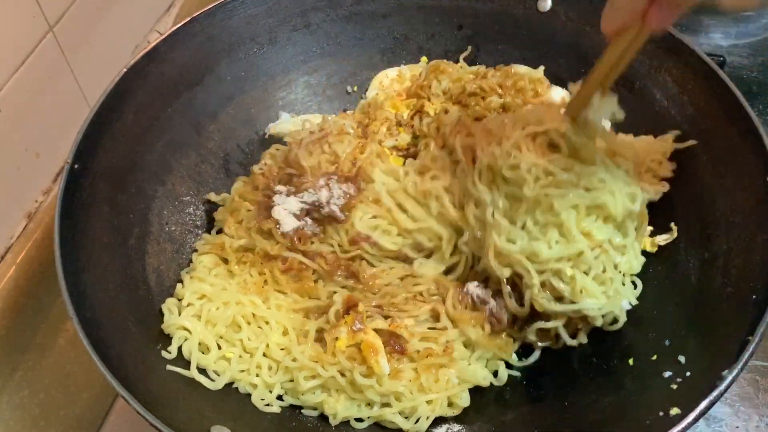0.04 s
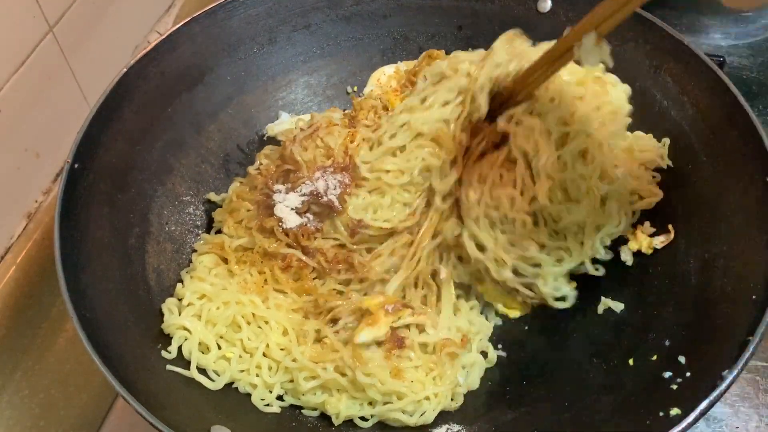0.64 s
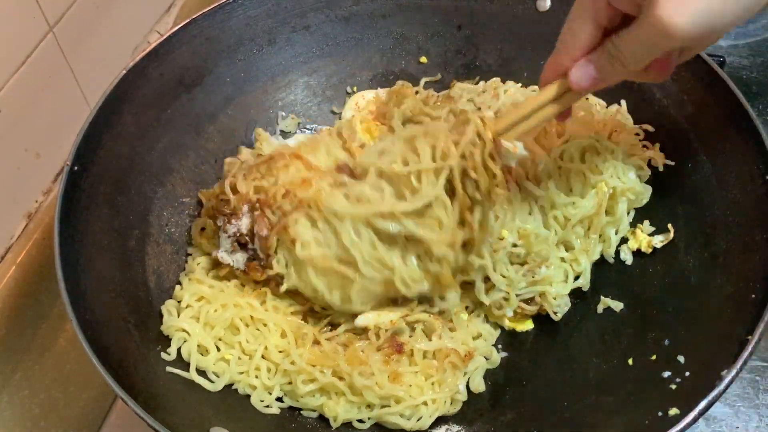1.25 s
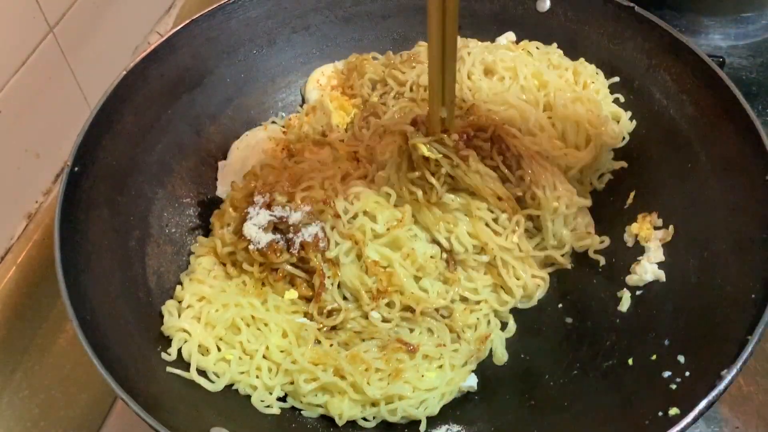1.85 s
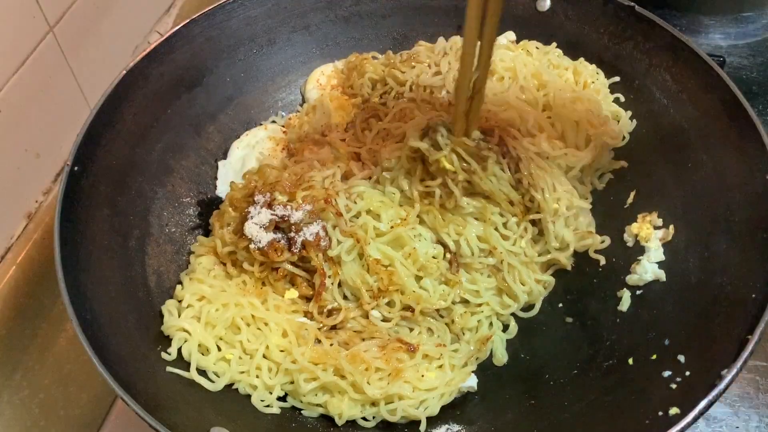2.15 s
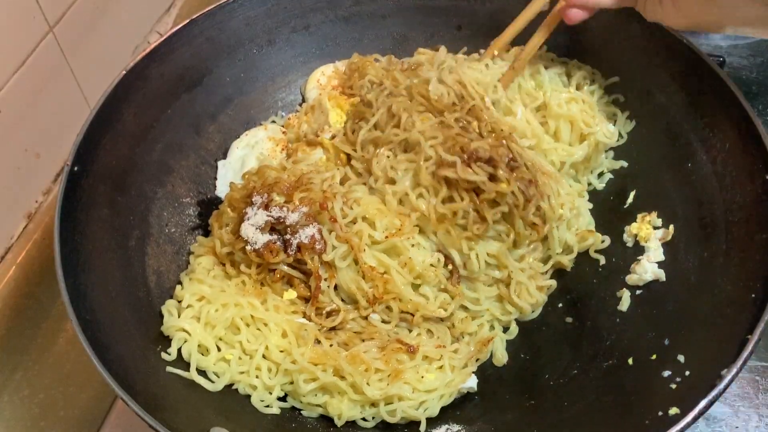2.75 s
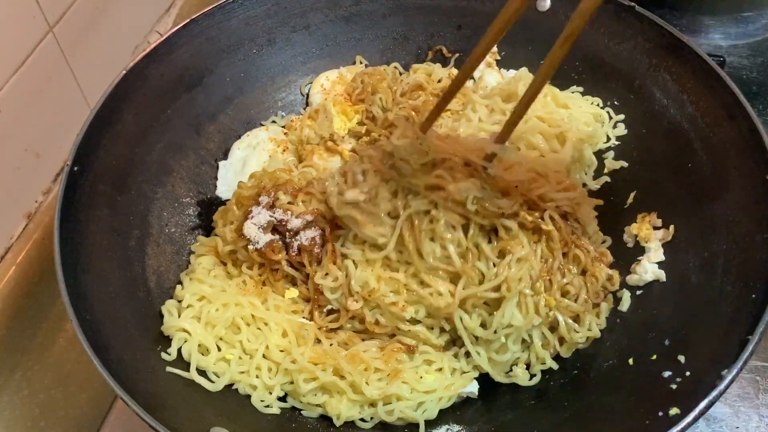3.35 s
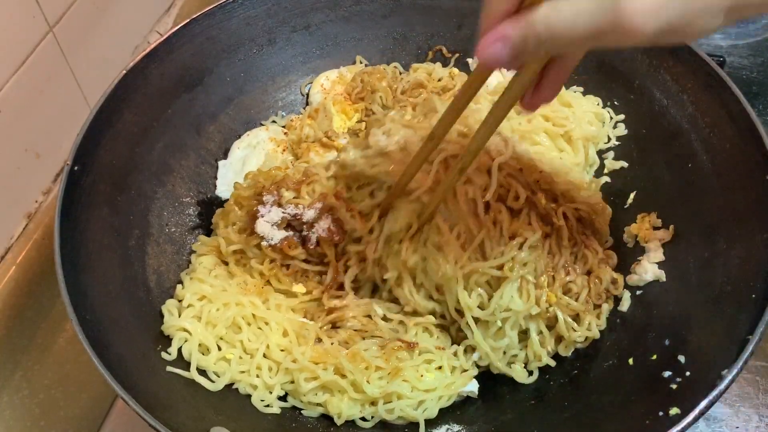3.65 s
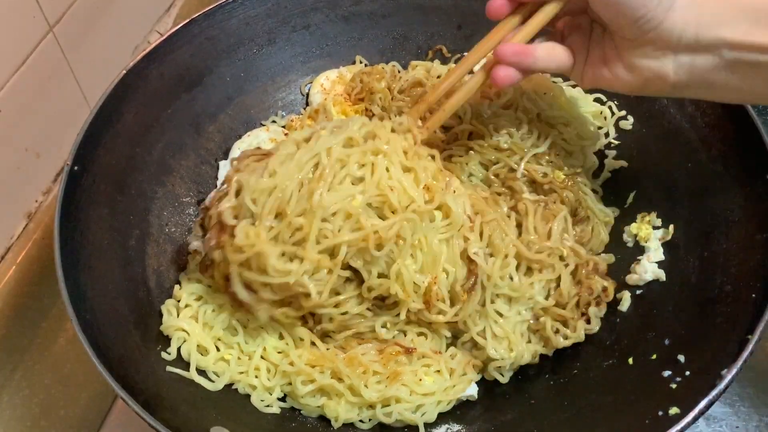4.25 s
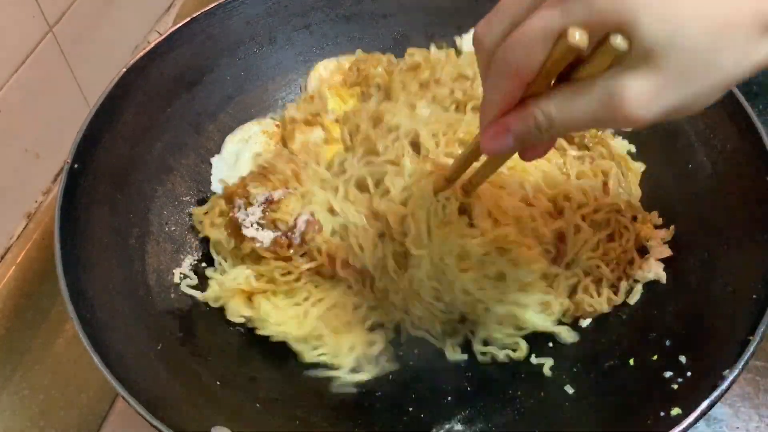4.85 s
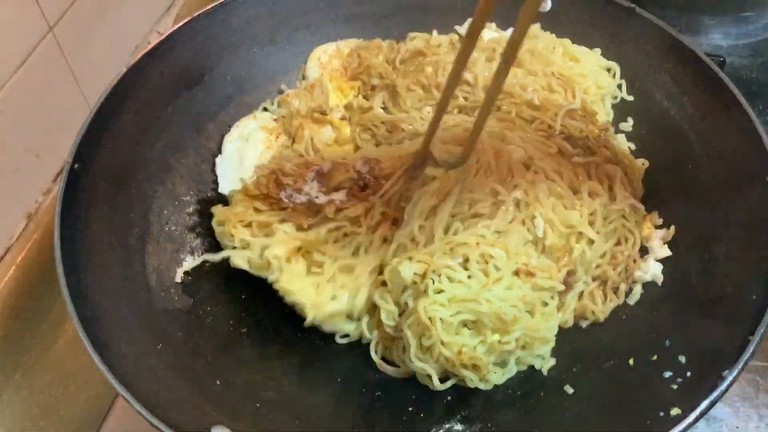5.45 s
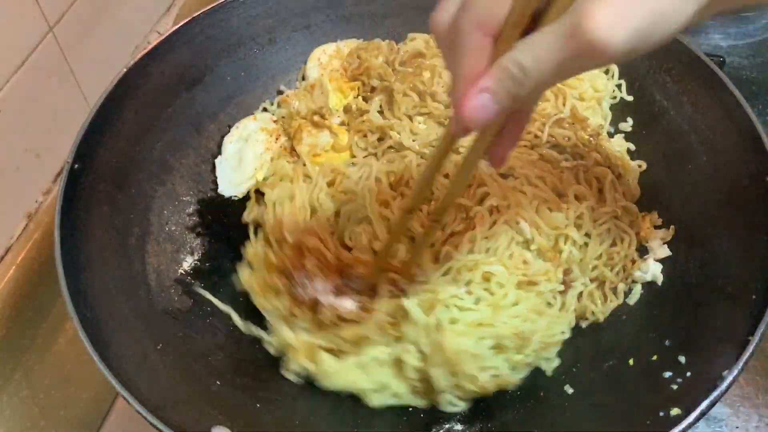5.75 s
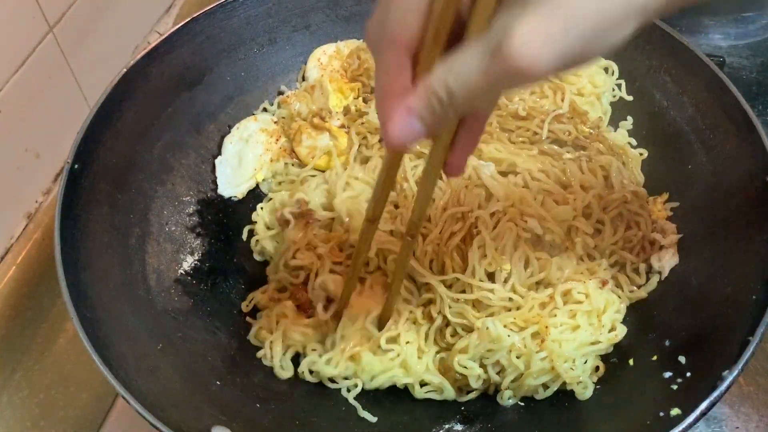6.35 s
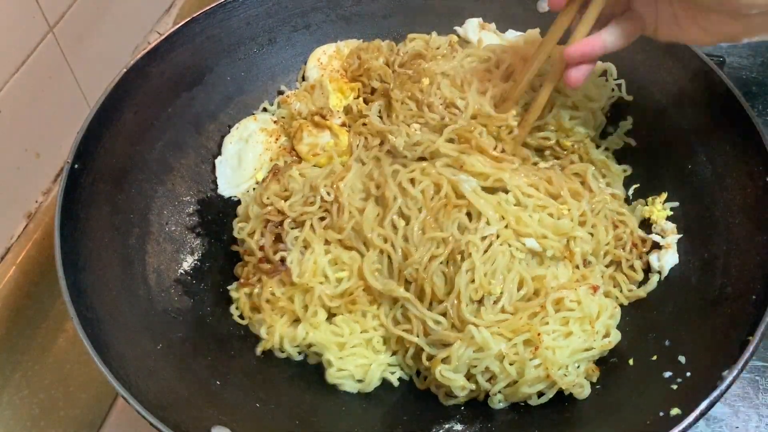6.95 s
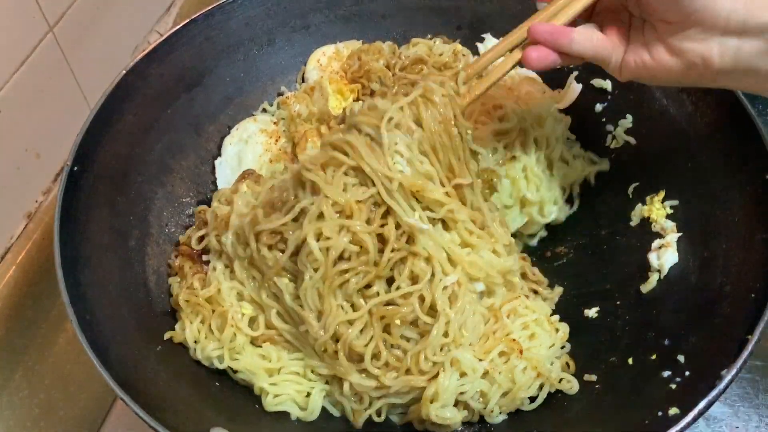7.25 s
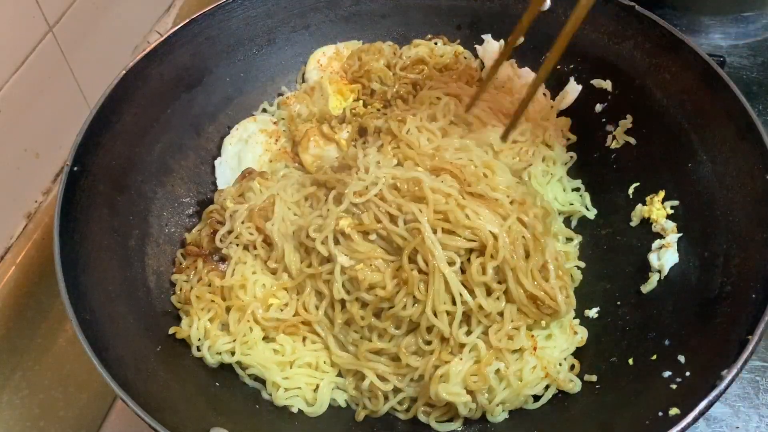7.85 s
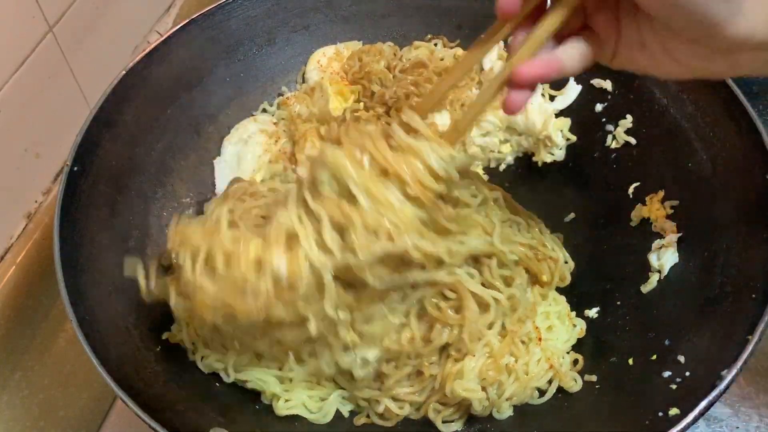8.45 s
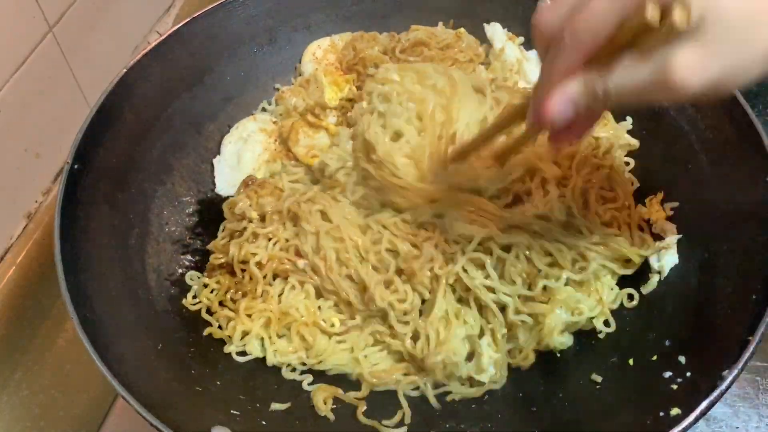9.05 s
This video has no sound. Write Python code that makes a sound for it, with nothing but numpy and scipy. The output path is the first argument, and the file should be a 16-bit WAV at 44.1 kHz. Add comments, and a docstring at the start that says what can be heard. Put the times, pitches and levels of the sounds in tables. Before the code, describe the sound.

Noodles fry in a steel wok, their bright sizzle and wet squelch swelling with each stir while fat spits. Wooden chopsticks skid and clack against the bowl, and the wok knocks hollowly on its stand with a low boom from the stove. The stirring eases briefly around two seconds in, then carries on unevenly and grows louder near the end. The microphone is close, in a kitchen.

```python
"""Noodles fry in a steel wok on a stove, turned with wooden chopsticks close to a phone.
Wet strands squelch, slap and hiss as they meet hot metal, swelling with each stir, and fat spits.
The chopsticks skid and clack on the bowl; each push rocks the wok on its stand with a dull knock
and a low boom from the stove. The loudest blows overload the phone."""
import sys
import numpy as np
from scipy import signal
from scipy.fft import rfft, irfft, next_fast_len
from scipy.io import wavfile
from scipy.ndimage import uniform_filter1d, minimum_filter1d

SR = 44100
rng = np.random.default_rng(int(sys.argv[2]) if len(sys.argv) > 2 else 0)


def log_audio(samples):
    """Write samples as a 16-bit WAV file to the path given in sys.argv[1]."""
    # one column per channel
    frames = np.atleast_2d(samples).T
    # limit to full scale, then quantise
    limited = np.clip(frames, -1, 1)
    pcm = np.round(limited * 32767).astype(np.int16)
    wavfile.write(sys.argv[1], SR, pcm)


N = 405719
TIME = np.arange(N) / SR
HIT_TIME = TIME[:24576]

# Levels in the cue lists are faders; each layer adds its own trim.
# wet noodles laid on hot steel: crest t/s, sizzle level/dB, squelch level/dB, swell t/s, dying away t/s
STIR_CUES = [(0.02, -18, -15.5, 0.059, .15), (0.45, -20, -23, .035, .16), (0.63, -20.5, -20, .22, .42),
             (0.871, -24, -28, 0.129, .2), (1.08, -33, -39, .2, .25), (1.43, -19, -23.5, .22, .15),
             (1.62, -29, -29.5, .2, .38), (1.96, -38, -33, .06, .1), (2.599, -32, -36, .15, .2),
             (2.82, -34, -29, .2, .35), (3.15, -24, -29, .25, .15), (3.329, -24.5, -31, .13, .17),
             (3.73, -20.5, -22, .2, .27), (4.15, -33, -32, .15, .3), (4.35, -25.5, -39, .25, .35),
             (4.62, -22, -32, .16, .35), (4.88, -30, -25.5, .15, .16), (5.06, -29, -37, .3, .13),
             (5.58, -36.5, -46, .3, .1), (5.94, -26, -33, .3, .3), (6.17, -30, -35, .15, .2),
             (6.57, -31, -45, .22, .15), (6.87, -30, -32, .22, .25), (7.08, -23.5, -28, .18, .16),
             (7.31, -26, -44.5, .13, .3), (7.5, -27.5, -52, .17, .12), (7.739, -23.5, -37, .1, .28),
             (8.3, -33, -39, .2, .15), (8.6, -21, -26, .27, .24), (8.71, -20, -18.5, .16, .13),
             (9.0, -21, -24.5, .24, .7)]
# how busy the hand is; it rests once: t/s, level/dB
HAND_ACTIVITY = [(0, 0), (1.85, 0), (2.12, -10), (2.32, -9), (2.55, 0), (9.2, 1)]
# chopsticks hit the bowl: t/s, level/dB, squeak f/Hz, stick ring level/dB relative to the crack,
# bowl level/dB, tip click level/dB, thump level/dB, lead-in skid t/s
CLACK_CUES = [(0.008, -7.5, 1940, -7.5, -14.5, -7.5, -12, 0.0092),
              (0.8402, -8.5, 3597, -8, -11, -13, -11, 0.0021),
              (1.9906, -6.5, 4400, -10, -4, -7, -42, 0.0034),
              (2.5597, -5.5, 2435, -11, -12.5, -13, -20, .002),
              (3.9832, -3, 3357, -7, -4.5, -13, -11, 0.0036),
              (4.6612, -3.5, 3013, -4, -10.5, -17, -11, 0.009),
              (5.2521, -2.5, 3005, -7.5, -25, -11, -20, 0.01),
              (5.7272, -8, 2787, -2, -10.5, -16, -13.5, 0.0053),
              (6.05, -5.5, 3000, -2, -15.5, -9.5, -27, 0.0079),
              (6.4109, -8.5, 2810, 0, -15.5, -13, -17.5, 0.0087),
              (6.7874, -4.5, 3725, -12, -4, -28.5, -8, 0.00097), (8.003, 1, 4500, -9, -8, -4, -20, .002)]
# the wok knocks on its stand: t/s, level/dB, favoured f/Hz, boom level/dB, tick level/dB,
# rebound spacing t/s, first rebound level/dB relative to the blow
KNOCK_CUES = [(0.0565, 3, 364, -5, -2, 0.094, -14), (0.254, -7, 285, -6.5, -51, 0.077, -17),
              (0.348, -1, 262, -7.5, -12.5, 0.047, -25), (0.4729, -2, 362, -7, -10, .072, -11.5),
              (0.9216, 0, 290, 0, -12, 0.052, -15), (1.4748, 5, 494, -25, 1, .049, -11),
              (1.716, 0.5, 289.8, -3.5, -15, 0.057, -13.5), (2.6867, -3.5, 284, -2, -25, 0.049, -9.5),
              (3.7406, 5.5, 385, -11, -0.5, 0.049, -9.5), (4.145, -4.5, 290.2, -2.5, -23, 0.067, -14.5),
              (4.797, 6, 369.3, -5.5, -1.5, .052, -4.5), (5.2774, -13, 305.3, -15.5, -17, 0.062, 5.5),
              (6.1445, -1.5, 393, -13, -12, .052, -6), (6.322, -22, 540, -21, -38, 0.063, -22),
              (7.1379, 0.5, 286.5, -3, -15, 0.052, -7), (8.7614, 4.5, 434.9, -6.5, -0.5, 0.073, -18.5),
              (9.0708, -9, 547, -9.5, -9, 0.054, -30)]
# sharp snaps from the wok, fat spitting and wet noodles slapping the steel: t/s, level/dB, centre f/Hz
SNAP_CUES = [(0.433, -8.5, 4950), (1.2362, -19, 15770), (1.417, -6.5, 3535), (1.953, -19.5, 2000),
             (2.3088, -30.5, 6360), (2.4317, -26, 2630), (2.4673, -11, 13500), (2.978, -18, 3032),
             (3.3378, -19, 3087), (3.574, -8, 10490), (4.488, -15, 15800), (6.7211, -17.5, 10940),
             (6.9541, -17, 3466), (7.3, -11, 13040), (7.475, -23.5, 3970), (7.5522, -13.5, 11100),
             (7.6792, -11, 7670), (7.9437, -21, 3900)]

# resonances: f/Hz, level/dB, 60 dB decay t/s
STICK_RING = [(2080, -4, .16), (2270, -5, .16), (2500, -7, .16), (2780, 0, .16), (2950, -1, .14),
              (3060, -6, .12), (3260, -2, .12), (3620, -4, .13), (3920, -5, .12), (4110, -5, .13),
              (4441, -9, .18), (4770, -7, .16)]  # chopsticks pressed against the steel
BOWL_RING = [(295, -5, .18), (490, -2, .15), (624, -4, .2), (880, -3, .2), (1109, -9, .2), (1380, -6, .2),
             (1632, -3, .19), (1766, -7, .15)]  # the steel bowl
STAND_RING = [(148.1, -5.5, 0.57), (178, -6.5, 0.31), (241, -5.5, 0.092), (286.8, -4.5, 0.21),
              (337, -7.5, 0.18), (373, -5.5, 0.12), (425.4, -15, 0.16), (468.2, 2, 0.13),
              (534.4, -2, 0.099), (628, -6, 0.18), (894, -21.5, 0.38)]  # the wok on its stand
STOVE_RING = [(38.9, -25, 0.61), (76.2, -13, 0.3), (95, -11.5, 0.54)]  # the stove under it

# tone colours: f/Hz, level/dB
SIZZLE_EQ = [(700, -29), (2000, -9), (3500, -1.5), (5300, -4), (6800, 0.5), (9000, 4.5), (11500, 2.5),
             (14000, 5), (16000, -4.5)]  # bright frying hiss
SQUELCH_EQ = [(150, -24), (400, -18), (800, -4), (1200, -4.5), (1700, -2.5), (2400, -2.5), (3500, -17.5),
              (6000, -37), (12000, -34)]  # wet midrange of the noodles
RUMBLE_EQ = [(15, 2), (36, -22), (50, -3.5), (85, 3.5), (115, 0), (165, -4), (230, -13), (400, -17),
             (900, -21), (3000, -39)]  # bass of the shaken stove
CLACK_EQ = [(300, -5.5), (1500, -4.5), (2300, 5), (3000, 5.5), (4000, 5.5), (5500, -5), (8000, -12),
            (16000, -5.5)]  # bite of wood on steel
TICK_EQ = [(300, -3), (800, 1), (1600, -8), (3000, -7), (6000, -21.5), (16000, -76)]  # metal tick
TIP_EQ = [(1000, -18), (4000, -9), (6500, 17.5), (9000, 24), (16000, -48)]  # thin click of the tips
RATTLE_EQ = [(60, 6), (140, 19.5), (300, -12), (520, 46), (750, -1), (1200, 8), (3000, -26.5), (8000, -70)]  # boxy rattle of the stand

# stereo image, how alike left and right are: f/Hz, coherence/0-1
STEREO_COHERENCE = [(80, 1), (250, 0.56), (500, 0.21), (1000, 0.37), (2500, 0.079), (5500, 0.0057),
                    (6600, 1), (8500, 1), (15000, 1)]
# the right channel over the left: f/Hz, level/dB
STEREO_BALANCE = [(250, 0), (450, 2), (750, -2), (2000, -0.5), (3500, 1), (5300, 4.5), (6600, 0)]


def undb(db):
    """Decibels to gain."""
    return 10 ** (np.asarray(db) / 20)


def along(hz, points):
    """Read (f/Hz, value) points on a log-frequency axis."""
    f, value = np.transpose(points)
    return np.interp(np.log(hz + 1), np.log(f), value)


def colour(x, eq):
    """Shape a sound with an EQ curve; rms 1."""
    size = next_fast_len(x.shape[-1])
    gain = undb(along(np.fft.rfftfreq(size, 1 / SR), eq))
    y = irfft(rfft(x, size) * gain, size)[..., :x.shape[-1]]
    return y / y.std()


def noise(eq, size=len(HIT_TIME)):
    """Coloured noise, unrelated left and right."""
    return colour(rng.standard_normal((2, size)), eq)


def fade(t60):
    """A decay of 60 dB in t60 seconds."""
    return np.exp(-np.log(1000) * HIT_TIME / t60)


def peak(x):
    """Scale a hit so that its loudest few milliseconds have rms 1."""
    return x / np.sqrt(uniform_filter1d(np.mean(x ** 2, axis=0), size=256).max())


def wobble(rate_hz, size=N):
    """Smooth random modulation with a spread near 1."""
    hold = max(int(SR / rate_hz), 16)
    steps = rng.standard_normal(4096)[np.arange(size) // hold]
    return 1.3 * uniform_filter1d(steps, hold)


def add(out, s, sound):
    """Mix a sound in at s seconds."""
    start = int(s * SR)
    first, last = max(start, 0), min(start + sound.shape[-1], N)
    out[:, first:last] += sound[:, first - start:last - start]


def kitchen(x, t60, wet_db):
    """Add dense reflections from the bowl and the tiled walls."""
    tail = rng.standard_normal((2, len(HIT_TIME))) * fade(t60)
    tail *= undb(wet_db) / np.sqrt(np.sum(tail ** 2, axis=1, keepdims=True))
    return x + signal.fftconvolve(x, tail, axes=1)[:, :N]


def stirring(handling_db):
    """Fader rides in dB for sizzle and squelch: each stir swells and dies away over a low simmer."""
    simmer_db, seep_db, swell_db = -44, -46, 23
    roundness = 1.3  # above 1 a stir lingers at its crest and leaves a deeper lull
    sizzle_power = undb(simmer_db + handling_db) ** 2
    squelch_power = undb(seep_db + handling_db) ** 2
    for s, sizzle_db, squelch_db, swell_s, dying_s in STIR_CUES:
        away = np.maximum((s - TIME) / swell_s, (TIME - s) / dying_s)
        near = away < 3
        power = undb(-swell_db * away[near] ** roundness) ** 2
        sizzle_power[near] += undb(sizzle_db) ** 2 * power
        squelch_power[near] += undb(squelch_db) ** 2 * power
    return 10 * np.log10(sizzle_power), 10 * np.log10(squelch_power)


def bubbles(activity, base_rate, low_hz, high_hz, cycles, spread_db, size):
    """Films and bubbles burst, each a brief tone of its own pitch: many faint, a few strong; rms 1."""
    starts = np.flatnonzero(rng.random(N) < base_rate * activity / SR)
    pitch, strength, *phases = rng.random((len(starts), 4)).T[:, :, None]
    hz = low_hz * (high_hz / low_hz) ** pitch
    turns = hz * TIME[:size]
    gain = undb(-spread_db * np.log(1 - .995 * strength)) * np.sqrt(hz / SR)
    envelope = gain * np.exp(-np.log(1000) * turns / cycles)
    where = (starts[:, None] + np.arange(size)).ravel()
    out = np.zeros((2, N))
    for channel, phase in enumerate(phases):
        grains = envelope * np.sin(2 * np.pi * (turns + phase))
        out[channel] = np.bincount(where, grains.ravel(), N + size)[:N]
    out /= np.sqrt(activity)  # busier means denser, not louder
    return out / out.std()


def sizzle(level_db):
    """Water flashes off the hot steel; fiercer frying packs the bursts closer, over a smooth hiss."""
    trim_db, flicker_db = 3.5, 1.5
    activity = undb(np.clip(.6 * (level_db - np.median(level_db)), -12, 8))
    fizz = bubbles(activity, base_rate=1700, low_hz=2520, high_hz=16000, cycles=20, spread_db=2, size=160)
    fizz = colour(kitchen(fizz, t60=.1, wet_db=-5), SIZZLE_EQ)
    hiss = undb(-10) * noise(SIZZLE_EQ, size=N)
    return (fizz + hiss) * undb(level_db + trim_db + flicker_db * wobble(rate_hz=35))


def squelch(level_db):
    """Sticky strands slap together in small wet pops; single ones snap apart with a sharper smack."""
    smack_db, flicker_db = -3.5, 1.6
    activity = undb(np.clip(.6 * (level_db - np.median(level_db)), -10, 9))
    pops = bubbles(activity, base_rate=700, low_hz=400, high_hz=6000, cycles=8, spread_db=3.3, size=384)
    smacks = bubbles(activity, base_rate=34, low_hz=1150, high_hz=6700, cycles=6.2, spread_db=0, size=320)
    smacks = undb(smack_db) * kitchen(smacks, t60=.18, wet_db=4)
    pops = colour(kitchen(pops, t60=.39, wet_db=3.5), SQUELCH_EQ)
    return (pops + smacks) * undb(level_db + flicker_db * wobble(rate_hz=25))


def stove_rumble(handling_db):
    """A low bed from the stove as the wok is pushed about."""
    return noise(RUMBLE_EQ, size=N) * undb(handling_db - 32.5)


def ring(modes, centre_hz=1000., focus_db=0., favour_db=0., scatter_db=0., detune=0., bend=0.):
    """A struck body rings: the place of contact favours modes at centre_hz and feeds far ones less."""
    wide_hz = 577  # around here and above, the two sides drift out of step
    chance = rng.standard_normal((len(modes), 3))
    # flexed steel is stiffer, so with bend the pitch starts sharp and settles
    clock = np.cumsum(1 + bend * fade(.1)) / SR
    out = 0
    for k, ((hz, db, t60), (strength, shift, side)) in enumerate(zip(modes, chance)):
        octaves = np.log2(hz / centre_hz)
        contact_db = favour_db * np.exp(-(octaves / .1) ** 2) - focus_db * octaves ** 2
        gain = undb(db + scatter_db * strength + contact_db)
        width = np.array([[side], [-side]]) * min((hz / wide_hz) ** 2, np.pi)
        phase = k ** 2 + width  # neighbouring modes start out of step
        out = out + gain * fade(t60) * np.sin(2 * np.pi * hz * (1 + detune * shift) * clock + phase)
    return peak(out * (1 - fade(.004)))


def chopstick_clacks():
    """The tips squeak over the steel, then catch with a crack: sticks and bowl ring, the stove thumps."""
    out = np.zeros((2, N))
    for s, db, squeak_hz, sticks_db, bowl_db, tip_db, thump_db, skid_s in CLACK_CUES:
        # stick and slip: a wavering tone in a rasp that lasts until the tips catch
        waver = 1 + .07 * wobble(rate_hz=500, size=len(HIT_TIME))
        squeak = np.sin(2 * np.pi * squeak_hz * np.cumsum(waver) / SR)
        lead_in = np.exp(-(HIT_TIME[::-1] / skid_s) ** 4)
        skid = (noise(CLACK_EQ) + .7 * squeak) * lead_in
        add(out, s - len(HIT_TIME) / SR, undb(db - 7) * skid)
        # the crack comes straight from the tips, the same to both sides
        crack = peak((noise(CLACK_EQ)[:1] + 1.7 * squeak) * fade(.017))
        sticks = ring(STICK_RING, squeak_hz, focus_db=14, favour_db=5, scatter_db=3, detune=.012)
        echo = undb(-9) * peak(noise(CLACK_EQ) * fade(.34))
        clack = undb(db) * (crack + undb(sticks_db) * sticks + echo)
        bowl = undb(-9) * ring(BOWL_RING, detune=.0038)
        tick = undb(-2) * peak(noise(TICK_EQ) * fade(.1))
        tip = undb(tip_db) * peak(noise(TIP_EQ) * (fade(.035) + undb(-22) * fade(.25)))
        thump = undb(thump_db - 3) * peak(noise(RUMBLE_EQ) * fade(.62) * (1 - fade(.096)))
        add(out, s, clack + undb(bowl_db) * (bowl + tick) + tip + thump)
    return out


def wok_knocks():
    """The wok lands with a tick and a hollow ring and rocks back twice; the stove booms and shudders."""
    body_trim_db, boom_trim_db, shudder_trim_db = -3.5, -8.5, -17
    out = np.zeros((2, N))
    boom = peak(ring(STOVE_RING) * (1 - fade(.3)) ** 2)
    swell = fade(.58) * (1 - fade(.39))
    swell /= swell.max()
    for s, db, mode_hz, boom_db, tick_db, rock_s, rebound_db in KNOCK_CUES:
        for bounce, bounce_db in enumerate([0, rebound_db, rebound_db - 11]):
            body = ring(STAND_RING, mode_hz, focus_db=2.5, favour_db=9.5,
                        scatter_db=2, detune=.02, bend=.095)
            # harder blows make the stand rattle more
            rattle = undb(.5 * (db + bounce_db) - 7) * peak(noise(RATTLE_EQ) * fade(.18))
            tick = peak(noise(TICK_EQ) * (fade(.03) + undb(-14) * fade(.22)))
            tick *= undb(tick_db - 4.5 * bounce)  # rebounds land with a softer edge
            knock = undb(db + body_trim_db) * (body + rattle) + tick
            add(out, s + bounce * rock_s, undb(bounce_db) * knock)
        shudder = undb(db + shudder_trim_db) * noise(RUMBLE_EQ) * swell
        add(out, s, undb(boom_db + boom_trim_db) * boom + shudder)
    return out


def snap(hz):
    """One sharp snap: a pinprick of noise centred on hz."""
    eq = [(hz / 6, -22), (hz / 2, -5), (hz, 0), (hz * 3, -12)]
    return peak(noise(eq, size=1024) * fade(.008)[:1024])


def wok_snaps(handling_db):
    """Fat spits and wet noodles slap the steel: featured snaps among a random scatter of faint ones."""
    faint_per_s, low_hz, high_hz = 4.3, 5600, 15300
    featured, faint = np.zeros((2, 2, N))
    for s, db, hz in SNAP_CUES:
        add(featured, s, undb(db) * snap(hz))
    for when, strength, pitch in rng.random((int(faint_per_s * N / SR), 3)):
        hz = low_hz * (high_hz / low_hz) ** pitch
        add(faint, when * N / SR, undb(-24.75 + 5 * strength) * snap(hz))
    return kitchen(featured + faint * undb(handling_db), t60=.22, wet_db=-2)


def scene():
    """The dry mix: wok and chopstick hits over the rumble and the frying."""
    handling_db = np.interp(TIME, *np.transpose(HAND_ACTIVITY))
    sizzle_db, squelch_db = stirring(handling_db)
    cookware = wok_knocks() + chopstick_clacks() + stove_rumble(handling_db)
    frying = wok_snaps(handling_db) + sizzle(sizzle_db) + squelch(squelch_db)
    return cookware + frying


def stereo_image(x):
    """Centred bass, wide middle, treble alike on both sides but turning in phase."""
    treble_from_hz, full_turn_hz = 6150, 4750
    size = next_fast_len(N + 4096)
    hz = np.fft.rfftfreq(size, 1 / SR)
    left, right = rfft(x, size)
    alike = np.clip(along(hz, STEREO_COHERENCE), 0, .99)
    mid = np.sqrt(1 + alike) * (left + right) / 2
    side = np.sqrt(1 - alike) * (left - right) / 2
    phase_lag = 2 * np.pi * np.maximum(hz - treble_from_hz, 0) / full_turn_hz
    lean = undb(along(hz, STEREO_BALANCE) / 2)
    left = (mid + side) / lean * np.exp(-1j * phase_lag)
    right = (mid - side) * lean
    return irfft(np.array([left, right]), size)[:, :N]


def record(dry):
    """The phone's fast limiter catches the blows, what slips through is clipped, and the top is cut."""
    threshold, drive, top_hz = 1.57, 1.108, 15850
    x = stereo_image(dry)
    allowed = 1 / np.maximum(np.abs(x).max(axis=0) / threshold, 1)
    gain = uniform_filter1d(minimum_filter1d(allowed, size=65), size=65)
    clipped = np.clip(drive * x * gain, -1, 1)
    high_cut = signal.ellip(8, .1, 50, top_hz, fs=SR, output="sos")
    return signal.sosfiltfilt(high_cut, clipped)


dry = scene()
out = record(dry)
log_audio(out)
```